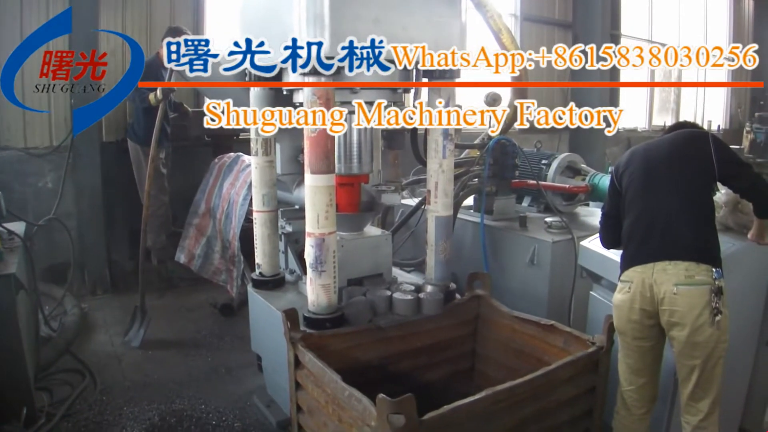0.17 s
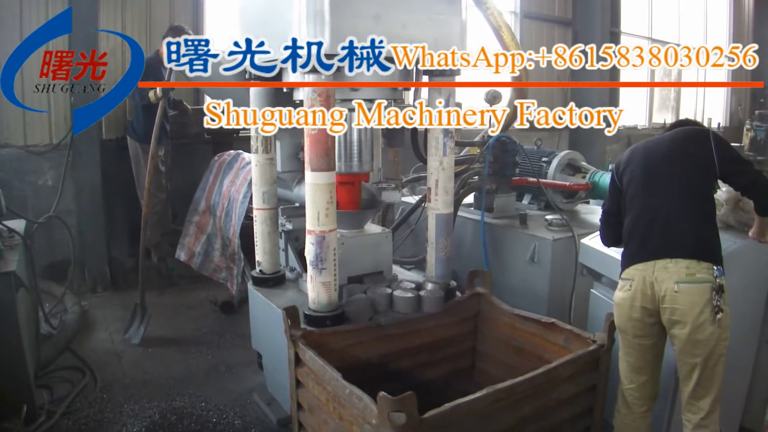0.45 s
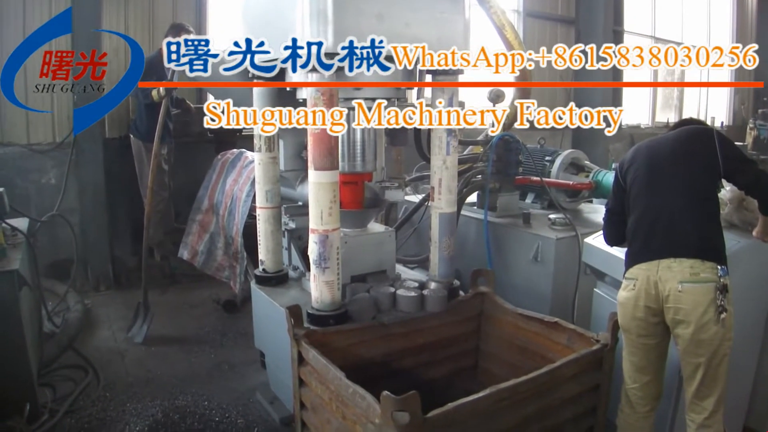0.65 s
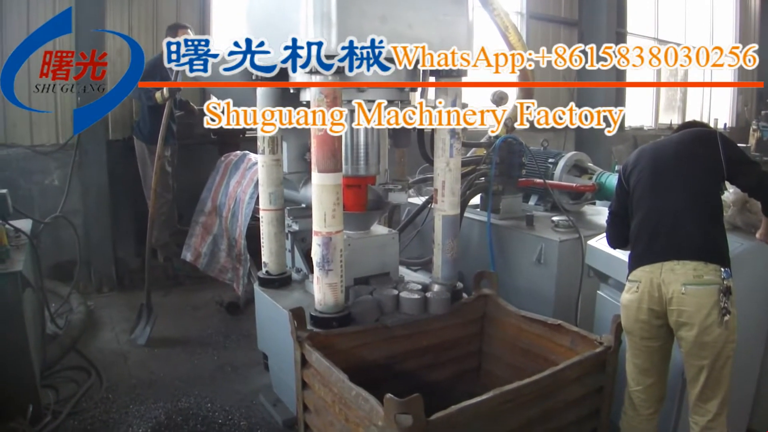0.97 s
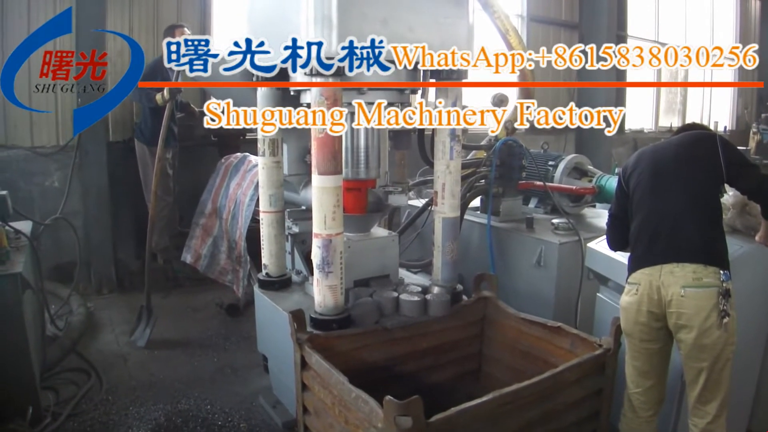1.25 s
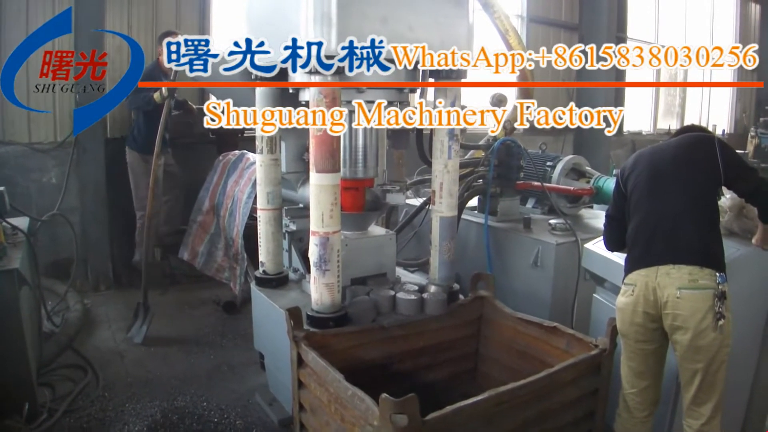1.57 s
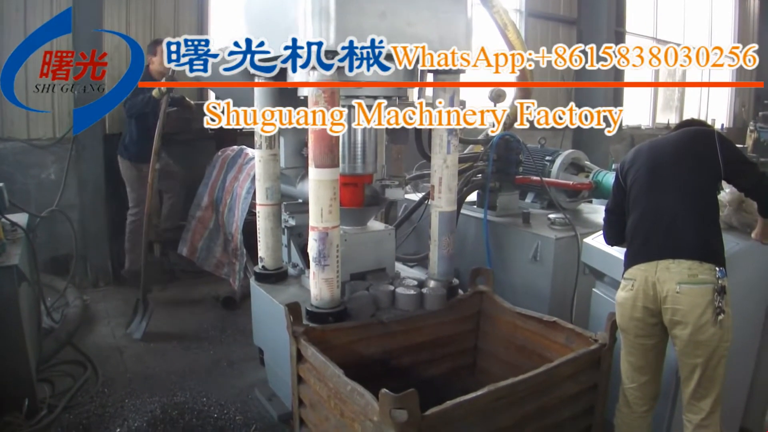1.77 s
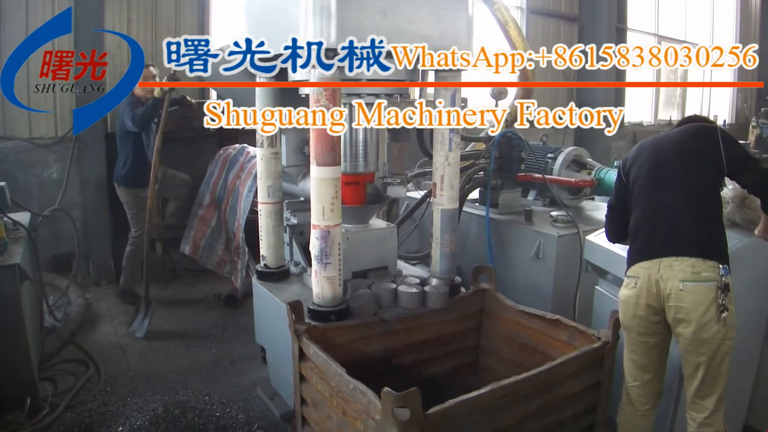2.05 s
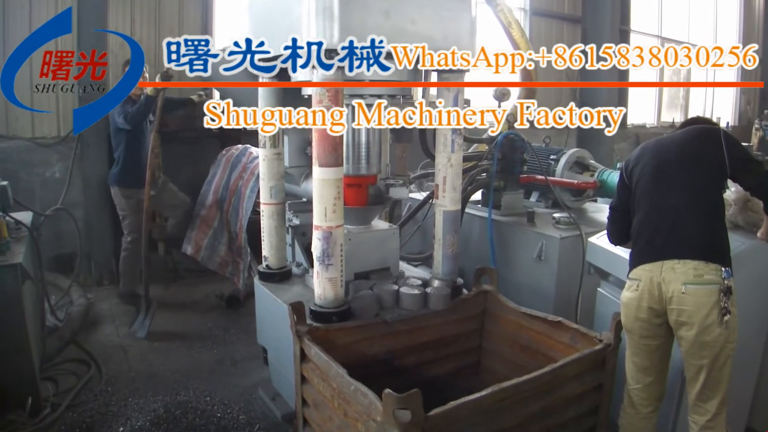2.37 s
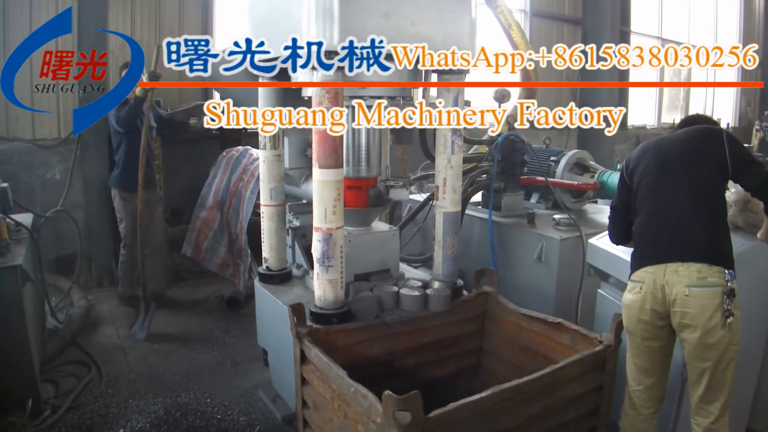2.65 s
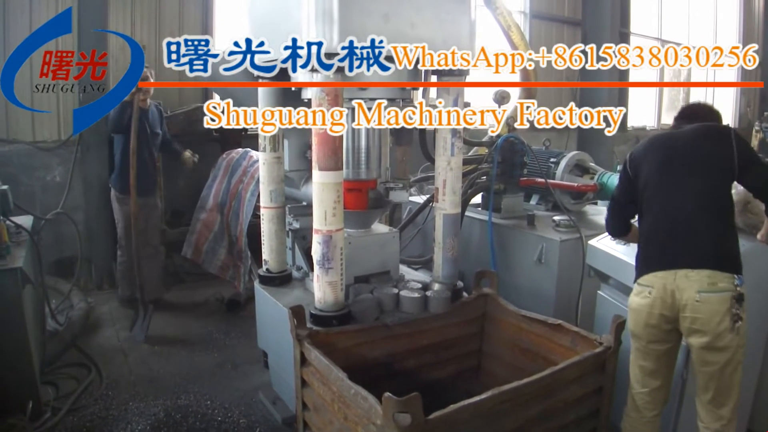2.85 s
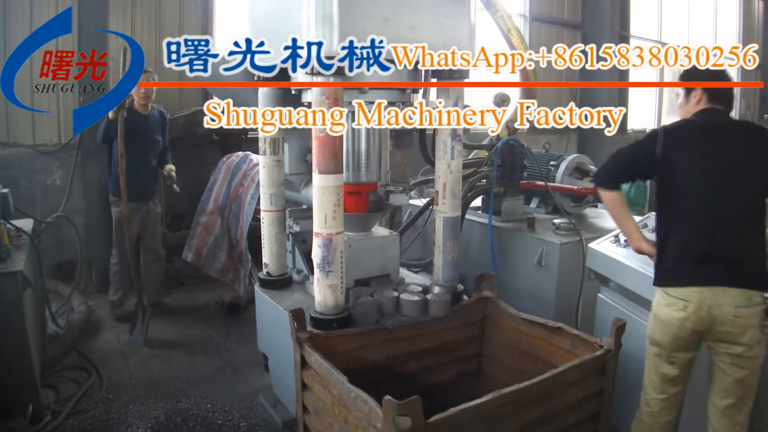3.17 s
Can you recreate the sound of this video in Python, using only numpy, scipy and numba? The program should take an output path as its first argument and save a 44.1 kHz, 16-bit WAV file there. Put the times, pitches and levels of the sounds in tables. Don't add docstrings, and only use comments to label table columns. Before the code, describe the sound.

Loud buzzing pump of a hydraulic press, heard close in stereo with diffuse room reflections, strains and whistles higher, then a metallic slam, a burst of hissing oil, brief rattling and a returning hum.

```python
import sys
import numpy as np
from scipy import signal
from scipy.fft import rfft, irfft
from scipy.io import wavfile
from numba import njit

SR = 44100
rng = np.random.default_rng(int(sys.argv[2]) if len(sys.argv) > 2 else 0)


def gain_from_db(level_db):
    decades = np.asarray(level_db, float) / 20
    return 10 ** decades


def put_to_file(sound):
    columns = np.atleast_2d(sound).T
    safe = np.clip(columns, -1, 1)
    whole_steps = np.round(safe * 32767)
    wavfile.write(sys.argv[1], SR, whole_steps.astype(np.int16))


N = 145530

HZ = np.maximum(np.fft.rfftfreq(N, 1 / SR), 1)
PISTONS = 7
PISTON_ORDERS = range(7, 113, 7)
ORDERS_HEARD = [24, 25, 26, 27, 30, 31, 33, 34, 37, 38, 40, 45, 46, 47, 48, 50, 51, 52, 61, 68, 89, 94]


def rms_one(x):
    return x / np.sqrt(np.mean(x ** 2) + 1e-20)


def in_time(rows):
    s, *columns = np.transpose(rows)
    return [np.interp(np.arange(N) / SR, s, column) for column in columns]


def outline_db(points):
    hz, db = np.transpose(points)
    return np.interp(np.log(HZ), np.log(hz), db)


def colour(x, points):
    return irfft(rfft(x) * gain_from_db(outline_db(points)), N)


def drift(rate):
    r = np.exp(-80 * np.pi * rate / SR)
    slow = signal.lfilter([1], [1, -2 * r, r * r], rng.standard_normal(N // 40 + 2002))
    slow = rms_one(slow[2000:])
    return np.interp(np.arange(N) / 40, np.arange(len(slow)), slow)


@njit
def glide(x, hz, width_hz, sr):
    y = np.zeros(len(x))
    for i in range(2, len(x)):
        r = np.exp(-np.pi * width_hz[i] / sr)
        push = (1 - r) ** .75 * (x[i] - x[i - 2])
        y[i] = push + 2 * r * np.cos(2 * np.pi * hz[i] / sr) * y[i - 1] - r * r * y[i - 2]
    return y


def twice(x, hz, width_hz):
    hz, width_hz = hz + np.zeros(N), width_hz + np.zeros(N)
    once = glide(x, hz, width_hz, SR)
    return rms_one(glide(once, hz, width_hz, SR))


def locked_noise(turns, stage):
    size = 1772
    lines = rfft(rng.standard_normal((7, size)))
    lines[:, [*PISTON_ORDERS, *ORDERS_HEARD]] = 0
    patterns = irfft(lines, size)
    at = (turns % 1 * size).astype(int)
    step = np.clip(2 * stage, 0, 5.999)
    k = step.astype(int)
    fade = step % 1 * np.pi / 2
    return patterns[k, at] * np.cos(fade) + patterns[k + 1, at] * np.sin(fade)


def piston_pulses(turns, stage):
    lead_turns, sharpness = 0.063, 1.7
    # (level at light load [dB], level under pressure [dB])
    piston_levels = [(-4, 0), (0, -4), (-8, -12), (-8, -5), (-3, -10), (0, -6), (-3, -5)]
    light, heavy = np.transpose(piston_levels)
    mix = np.clip(stage, 0, 1)
    at = (turns + lead_turns * mix) * PISTONS
    k = (at + .5).astype(int) % PISTONS
    strength = gain_from_db(light[k] * (1 - mix) + heavy[k] * mix)
    return strength * (np.abs(np.cos(np.pi * at)) ** sharpness + .45 - .15 * mix)


def hum(turns, step):
    crest_turn, crest_scatter = .223, .16
    wander_db, wander_cycles = 1, .025
    # (level at eight steps of rising pressure, then after release [dB])
    piston_hum = [(-42, -35, -33, -45, -40.5, -41, -47.5, -34, -33),
                  (-30, -41.5, -38.5, -27, -33.5, -43.5, -41, -35.5, -29),
                  (-46.5, -40.5, -30, -35.5, -25, -25.5, -36, -27.5, -29),
                  (-23, -31, -27, -20.5, -20, -29.5, -22.5, -29, -20.5),
                  (-25, -25.5, -37, -26, -40, -23, -28, -21.5, -31),
                  (-26, -53.5, -47, -36, -34.5, -35, -47, -36.5, -39),
                  (-30.5, -32, -28.5, -25, -31.5, -41, -26, -29, -31),
                  (-36, -29, -32, -32, -39.5, -31.5, -29.5, -31, -48),
                  (-56.5, -47, -37, -46, -35, -31.5, -40, -38, -43.5),
                  (-38, -46, -33, -32, -31, -44.5, -30, -35, -31.5),
                  (-46, -56, -34, -40, -41, -26, -49, -52, -49.5),
                  (-62, -56, -48, -40.5, -29, -23, -28, -24.5, -33),
                  (-59, -64, -54, -63, -49, -29, -26, -29.5, -34),
                  (-60, -59, -49, -42, -37, -26, -42.5, -32.5, -34),
                  (-56, -58, -34, -45, -33.5, -35, -30, -30.5, -37),
                  (-48, -37, -55, -39.5, -29, -34.5, -31, -44, -37)]
    order_levels = [(-24.5, -26.5, -32.5, -43, -33.5, -37.5, -33.5, -47, -37),
                    (-38, -27, -33.5, -30, -33, -47, -51, -43, -39.5),
                    (-27.5, -26.5, -40.5, -44, -38, -28, -46, -42, -38),
                    (-30, -24.5, -32, -33, -51, -47, -43, -36, -45),
                    (-34.5, -29, -26, -30, -31.5, -34, -45, -39, -50),
                    (-42, -37.5, -25.5, -38, -39, -37, -36, -47, -43),
                    (-29, -39, -27.5, -29.5, -36.5, -25.5, -29, -46, -34),
                    (-16.5, -17, -23.5, -19.5, -31.5, -39, -26, -27.5, -25.5),
                    (-26, -33, -48, -46, -39, -31, -30, -34, -43),
                    (-30, -29, -29.5, -31.5, -46, -40, -39, -32.5, -40),
                    (-32.5, -30, -33, -44, -28, -41, -34, -36, -32),
                    (-29, -29, -35, -41, -44, -39, -47, -56, -31),
                    (-42, -36.5, -30, -27.5, -24, -21.5, -18.5, -15, -21.5),
                    (-36.5, -36.5, -53, -37, -39, -39, -36, -43, -47.5),
                    (-24, -33, -29, -42, -37, -39.5, -40, -31, -27),
                    (-41, -28, -44, -48, -38, -33, -37.5, -33, -33),
                    (-35, -36, -34.5, -29.5, -35, -26.5, -45, -36.5, -36),
                    (-30.5, -25.5, -30.5, -45.5, -38, -31, -37, -29, -37.5),
                    (-30.5, -29, -30, -55, -28.5, -40, -35, -52, -36),
                    (-30.5, -28.5, -37, -43.5, -51, -57, -51.5, -47, -35),
                    (-48, -37, -29.5, -37, -40.5, -44, -41, -51, -38),
                    (-28.5, -26.5, -25, -30, -45, -41, -42, -46, -33)]
    scatter = crest_scatter * (1 + np.minimum(step, 4) / 4)
    out = 0
    for order, db in zip([*PISTON_ORDERS, *ORDERS_HEARD], [*piston_hum, *order_levels]):
        level = np.interp(step, np.arange(len(db)), db) + wander_db * drift(4.0)
        cycles = order * (turns - crest_turn) + 0.27
        cycles = cycles + scatter * rng.standard_normal() + wander_cycles * drift(4.9)
        out = out + gain_from_db(level) * np.sqrt(2) * np.sin(2 * np.pi * cycles)
    return out


def casing(turns, stage, pulses):
    level_db, pulsing = -21.5, 0.32
    # (frequency [Hz], level per Hz [dB])
    body = [(120, -39), (300, -13.5), (500, -8), (800, 2), (1300, -5.5), (2300, -1.5), (4500, -14.5),
            (10000, -25.5)]
    drive = locked_noise(turns, stage) * (1 - pulsing + pulsing * rms_one(pulses))
    return gain_from_db(level_db) * rms_one(colour(drive, body))


def valve(turns, stage, pulses, hz, db):
    locked = .55
    width_hz, narrowing_hz = 564, 110
    # (frequency at light load [Hz], climb per load stage [Hz], level [dB])
    pipe_rings = [(5817, 7.7, -13.5), (6642, 73, -12.5)]
    # (frequency [Hz], width [Hz], level at light load [dB], growth per load stage [dB])
    faint_rings = [(9110, 280, -45, 3), (8530, 110, -53.5, 4.5), (5730, 69, -56, 6)]
    bursts = np.sqrt(locked) * locked_noise(turns, stage) + np.sqrt(1 - locked) * rng.standard_normal(N)
    drive = pulses * bursts
    width = width_hz - narrowing_hz * stage + 120 * np.maximum(stage - 2, 0)
    whistle = twice(drive, hz, np.maximum(width, 150))
    for ring_hz, climb, ring_db in pipe_rings:
        whistle = whistle + gain_from_db(ring_db) * twice(drive, ring_hz + climb * stage, 150.0)
    out = gain_from_db(db) * whistle
    for ring_hz, ring_width, ring_db, grow in faint_rings:
        hissing = drive + 0.72 * rng.standard_normal(N)
        out = out + gain_from_db(ring_db + grow * stage) * twice(hissing, ring_hz, ring_width)
    return out


def tick(turns, stage):
    level_db, fade_db = -31, 8
    # (frequency [Hz], width [Hz], level [dB])
    tick_rings = [(2200, 250, 5), (4200, 600, -4), (7000, 900, -13), (1600, 250, 2)]
    once_a_turn = np.diff(np.floor(turns + .095), prepend=0)
    drive = once_a_turn * gain_from_db(1.5 * rng.standard_normal(N)) + 1e-18
    rings = twice(drive, 5250, 600)
    for hz, width_hz, db in tick_rings:
        rings = rings + gain_from_db(db) * twice(drive, hz, width_hz)
    return gain_from_db(level_db - fade_db * stage) * rings


def knock():
    knock_s, rise_s = 2.831, .002
    # (frequency [Hz], level [dB], t60 [s])
    modes = [(2530, -2, 0.06), (2440, -18.5, 0.15), (1636, -5.5, 0.066), (1150, -10, 0.047),
             (3540, -23.5, 0.022), (704, -15, .06)]
    t = np.maximum(np.arange(N) / SR - knock_s, 0)
    rise = np.minimum(t / rise_s, 1)
    return sum(gain_from_db(db - 60 * t / t60) * np.sin(2 * np.pi * hz * t) * rise for hz, db, t60 in modes)


def oil_rush(rush_db):
    # (frequency [Hz], level per Hz [dB])
    pipe_colour = [(90, -29), (170, -4), (250, -4), (700, -1.5), (2500, -6), (4500, -17), (7500, -19),
                   (10400, -32.5)]
    flow = rms_one(colour(rng.standard_normal(N), pipe_colour))
    return gain_from_db(rush_db + 2.16 * drift(15.0)) * flow


def clatter():
    blow_times = [2.819, 2.828, 2.853, 2.892, 2.921, 2.934, 2.94, 2.945, 2.951, 2.959, 2.966, 2.967, 2.981,
                  3.004, 3.074, 3.141, 3.144, 3.157, 3.185, 3.192, 3.2, 3.26, 3.29]
    # (level [dB], centre [Hz], t60 [s])
    blows = [(-12, 3200, .075), (-7.5, 1480, 0.074), (-20.5, 2400, .062), (-18, 210, .08),
             (-14.5, 1000, 0.06), (-14.5, 5700, .04), (-18, 5000, .05), (-12, 5200, 0.11),
             (-20, 8500, .046), (-15.5, 420, .26), (-15.5, 9400, 0.077), (-24, 5100, .03), (-21, 7000, .04),
             (-15.5, 1400, .05), (-14.5, 6200, 0.046), (-15, 900, .05), (-14.5, 350, 0.13),
             (-21, 6400, .07), (-14.5, 1000, .1), (-14, 480, 0.19), (-22.5, 2470, .06), (-15.5, 440, .05),
             (-13.5, 400, .04)]
    out = 0
    for s, (db, hz, t60) in zip(blow_times, blows):
        t = np.maximum(np.arange(N) / SR - s, 0)
        sos = signal.butter(1, [hz / 1.86, hz * 1.21], "band", fs=SR, output="sos")
        band = rms_one(signal.sosfilt(sos, rng.standard_normal(N)))
        out = out + gain_from_db(db - 60 * t / t60) * np.minimum(t / 0.002, 1) * band
    return out


def rumble(rush_db):
    top_hz, level_db, lumpy_db = 130, -53, 5
    sos = signal.butter(2, [top_hz / 4, top_hz], "band", fs=SR, output="sos")
    low = rms_one(signal.sosfilt(sos, rng.standard_normal(N)))
    swell_db = .9 * (rush_db - rush_db.mean())
    return gain_from_db(level_db + swell_db + lumpy_db * drift(3.9)) * low


def workshop(mid):
    t60_s, delay_s, before = .9, .03, 7085
    # (frequency [Hz], level [dB])
    diffuse = [(60, -12), (150, -20.5), (600, -21.5), (1200, -19.5), (2500, -11), (5000, -7), (9000, -8.5)]
    lags = np.arange(SR) / SR
    echoes = rng.standard_normal(SR) * gain_from_db(-60 * lags / t60_s) * (lags > delay_s)
    running = np.r_[mid[before:0:-1], mid]
    room = signal.fftconvolve(running, echoes / np.linalg.norm(echoes))
    return colour(room[before:before + N], diffuse)


def microphones(mid, side):
    lag_s = 1.3e-5
    # (frequency [Hz], level [dB])
    tilt = [(100, -.1), (2500, -0.021), (5000, -0.99), (10000, -1.2)]
    half = gain_from_db(outline_db(tilt) / 2) * np.exp(-1j * np.pi * HZ * lag_s)
    left = irfft(rfft(mid) * half, N) + side
    right = irfft(rfft(mid) / half, N) - side
    return np.array([left, right])


def scene():
    # (time [s], speed [turns per s])
    shaft = [(0, 24.92), (.9, 24.9), (1.4, 24.83), (1.9, 24.76), (2.3, 24.62), (2.55, 24.54), (2.7, 24.46),
             (2.82, 24.27), (2.88, 24.75), (3.3, 24.73)]
    # (time [s], step of the hum tables, load stage [0-3])
    pressure = [
        (.25, 0, 0),
        (.9, 1, .4),
        (1.35, 2, 1.1),
        (1.75, 3, 1.5),
        (2.1, 4, 1.9),
        (2.35, 5, 2.3),
        (2.55, 6, 2.8),
        (2.72, 7, 3),
        (2.815, 7, 3),
        (2.85, 8, 2),
    ]
    # (time [s], pump level [dB], whistle frequency [Hz], whistle level [dB], oil rush level [dB])
    load = [(0, -0.7, 5890, -28, -21.5), (.6, -0.3, 5960, -25, -23), (1.2, 0.6, 6090, -18, -23),
            (1.7, 0.56, 6310, -18.5, -24.5), (2.2, 0.9, 6380, -17.5, -23), (2.5, 0.6, 6480, -21.5, -24),
            (2.68, 1.6, 6400, -23.5, -31.5), (2.815, 0.7, 6900, -28, -21.5),
            (2.835, -10.5, 6200, -34, -14.5), (2.885, -5, 6400, -39, -10),
            (2.895, -10.5, 6220, -20.5, -14.5), (3.0, -2.8, 6400, -21.5, -16), (3.12, -0.3, 6350, -19, -20),
            (3.19, -5.5, 6080, -19, -14), (3.3, -3.5, 6220, -21, -21.5)]
    speed, = in_time(shaft)
    step, stage = in_time(pressure)
    pump_db, whistle_hz, whistle_db, rush_db = in_time(load)
    turns = .23 + np.cumsum(speed) / SR
    pulses = piston_pulses(turns, stage)
    mid = gain_from_db(pump_db) * (hum(turns, step) + casing(turns, stage, pulses))
    mid = mid + valve(turns, stage, pulses, whistle_hz, whistle_db) + tick(turns, stage)
    mid = mid + knock() + oil_rush(rush_db) + clatter() + rumble(rush_db)
    return microphones(mid, workshop(mid))


def band_limit(x):
    return signal.sosfilt(signal.butter(12, 10490, fs=SR, output="sos"), x)


def record(dry):
    limited = 1.167 * np.tanh(dry / 1.394)
    top_cut = signal.cheby2(12, 70, 11400, fs=SR, output="sos")
    mix = np.clip(signal.sosfilt(top_cut, limited), -1, 1)
    return band_limit(mix)


dry = scene()
out = record(dry)
put_to_file(out)
```